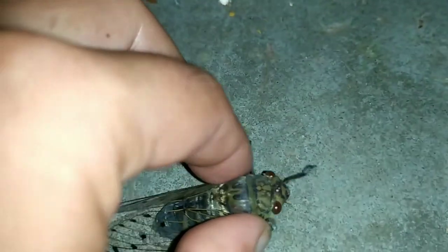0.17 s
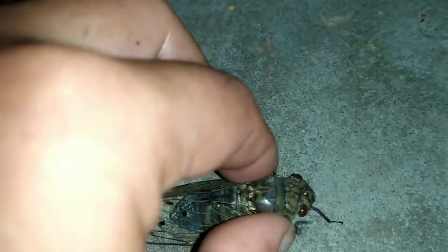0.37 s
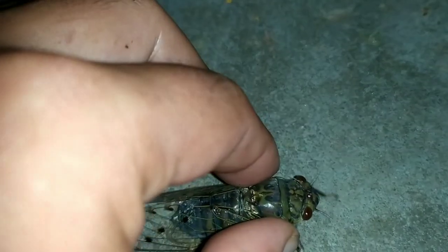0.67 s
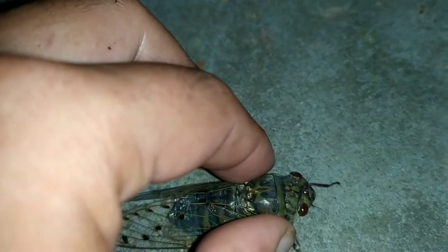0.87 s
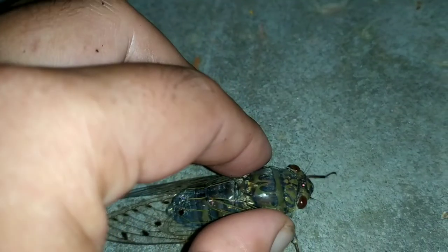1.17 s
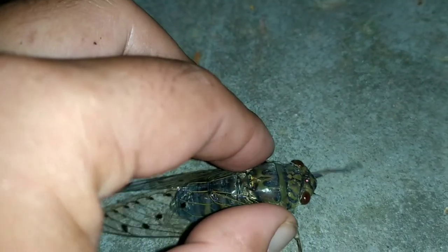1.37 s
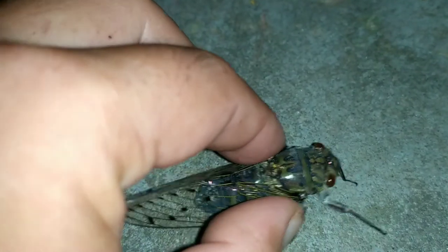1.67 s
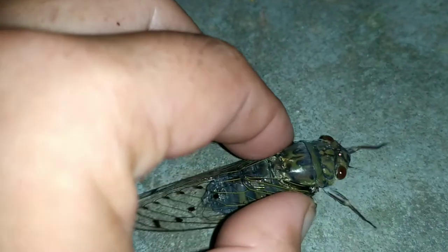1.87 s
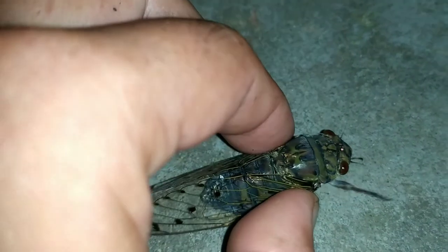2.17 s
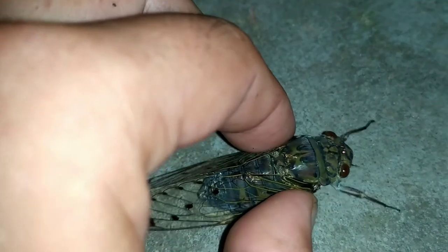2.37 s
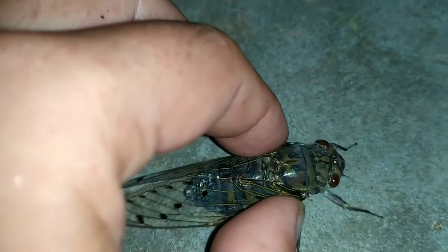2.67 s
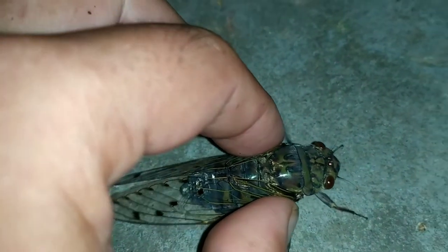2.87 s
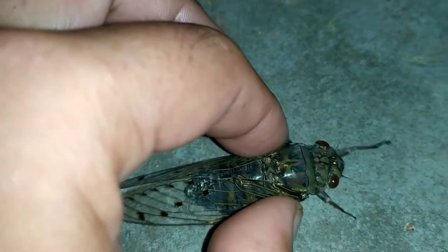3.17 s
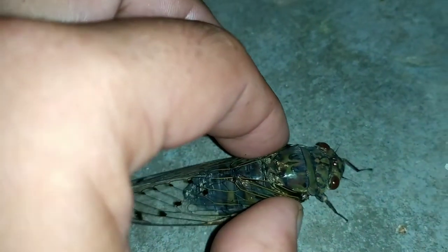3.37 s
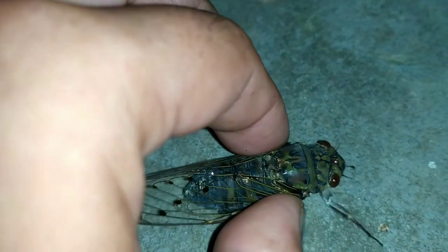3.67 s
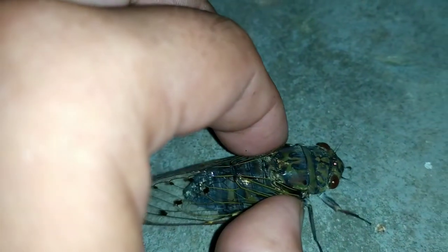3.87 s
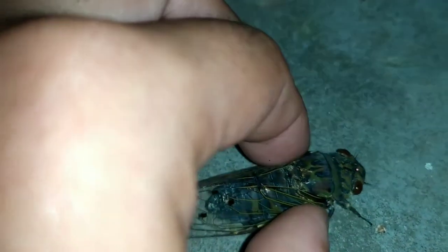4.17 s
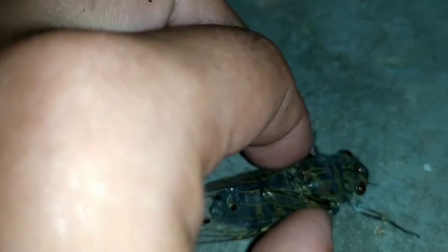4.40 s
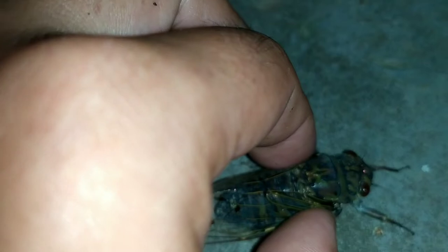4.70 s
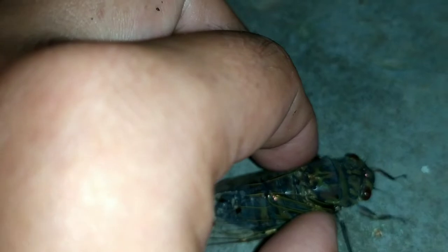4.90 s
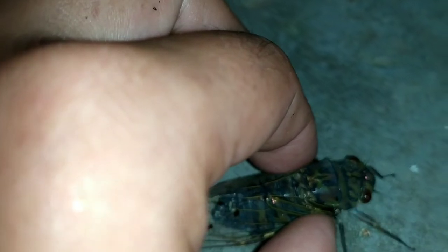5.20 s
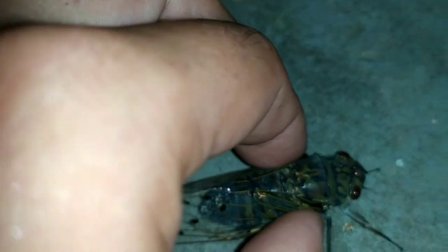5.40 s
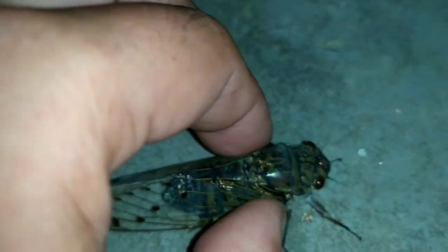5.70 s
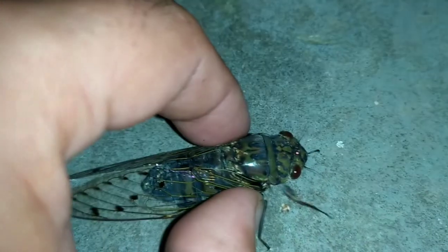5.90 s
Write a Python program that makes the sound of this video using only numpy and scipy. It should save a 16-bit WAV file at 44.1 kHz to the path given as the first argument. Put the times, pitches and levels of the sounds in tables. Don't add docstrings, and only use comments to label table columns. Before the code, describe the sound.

Bursts of raspy, buzzing cicada chirr very close up, separated by faint leg ticks and wing brushes, above a soft electrical hum and thin insect hiss.

```python
import sys
import numpy as np
from scipy import signal
from scipy.fft import rfft, irfft, next_fast_len
from scipy.io import wavfile
from scipy.ndimage import uniform_filter1d, map_coordinates

SR = 44100
rng = np.random.default_rng(int(sys.argv[2]) if len(sys.argv) > 2 else 0)


def unload_audio(sound):
    columns = np.transpose(np.atleast_2d(sound))
    steps = np.round(np.clip(columns, -1, 1) * 32767)
    wavfile.write(sys.argv[1], SR, steps.astype(np.int16))


def boost_factor(decibels):
    exponent = np.asarray(decibels, float) / 20
    return 10 ** exponent


N = 266628

# (first stroke t/s, last stroke t/s, strokes, hitch after the first/ms, grip number)
BUZZES = [
    (.4196, .5923, 32, 7.5, 0),
    (.6598, .6687, 2, 0, 0),
    (1.6302, 1.6713, 8, 1.8, 1),
    (1.7798, 1.8497, 14, -.5, 1),
    (2.5747, 2.6031, 5, 0, 2),
    (2.6117, 2.6905, 15, 1.5, 2),
    (3.023, 3.137, 20, 2, 2),
    (3.339, 3.4518, 21, 0, 2),
    (4.0229, 4.1228, 19, 0, 3),
]
# (belly level/dB, drum level/dB, drum swell over the run/dB, rib click rate f/Hz,
# far drum weaker by/dB)
VOICES = [(-25, -20.5, -1, 1060, -1.3), (-28.5, -22.5, 0.5, 1100, -3), (-24, -32, 3, 1170, 1),
          (-26.5, -29.5, 6, 1080, 0), (-27, -28.5, 5, 1100, 2.5), (-28, -24, 4, 1070, -1.5),
          (-27.5, -22.5, 0.5, 1095, 3), (-27.5, -22, 1.8, 1055, -0.5), (-24, -18.5, 2.5, 1090, -0.5)]
# (far drum late/ms, rattle level/dB, belly width/Hz, extra wait of the last stroke/ms)
GRIP_MANNERS = [(0, -15, 460, 2.2), (-0.19, -7, 360, 1.5), (-0.49, -15.5, 1070, 4.4),
                (0.07, -13.5, 530, 2.6)]
# (f/Hz, width/Hz, left level/dB, right level/dB)
DRUM_GRIP_0 = [(2240, 1040, -9.5, -28), (3240, 3000, -13, -13.5), (4160, 690, -22, -43),
               (5245, 250, 4, -6.5), (6020, 910, -1.5, -7.5), (7060, 2250, -3.5, -5.5),
               (10300, 3900, -8.5, -9.5), (13400, 1700, -11.5, -11)]
DRUM_GRIP_1 = [(2610, 610, -2, -21), (3350, 990, -9, -6), (4330, 370, -9.5, -24), (5260, 410, 3, -11.5),
               (6270, 820, -2, -7), (7640, 2250, -5.5, -6.5), (9850, 2500, -30, -8),
               (12000, 2200, -20, -10.5)]
DRUM_GRIP_2 = [(2374, 774, -15, -48), (3345, 550, -15.5, -13), (4760, 620, -11, -16.5), (5680, 315, 3, -6),
               (6940, 2270, -6.5, -17.5), (8030, 670, -5, -9), (9600, 540, -23.5, -15),
               (12500, 2600, -16.5, -19.5)]
DRUM_GRIP_3 = [(2300, 340, -11, -18.5), (3440, 990, -14, -12), (4230, 240, -11, -26),
               (5446, 300, 1.5, -3.5), (6230, 340, 2.5, -5), (8070, 610, -1, -4), (10000, 650, -7, -10),
               (12300, 2400, -12, -18)]
DRUM_GRIPS = [DRUM_GRIP_0, DRUM_GRIP_1, DRUM_GRIP_2, DRUM_GRIP_3]
DRUM_SIGNS = [(1, 1), (-1, 1), (-1, -1), (1, 1), (-1, -1), (1, 1), (-1, -1), (1, 1)]
# (push on belly level/dB, snap of drum level/dB)
RIBS = [(-1, -9), (0, -3), (0, -1), (-1, 0), (-3, -2), (-9, -8)]
# (t/s, peak level/dB, f/Hz, left over right/dB, t60/s)
CLAW_TICKS = [
    (2.1636, -20.5, 5600, 1, 0.0015),
    (2.187, -20, 5550, 4, 0.0021),
    (4.715, -24, 6730, 7, 0.0096),
    (4.969, -20.5, 7560, 5, 0.017),
    (5.173, -28, 5800, 7, 0.005),
]
# (t/s, peak level/dB)
WING_BRUSHES = [(0.2099, -45), (1.511, -38), (2.0682, -50), (2.366, -44), (2.5132, -39), (3.5428, -43),
                (3.6641, -46), (3.8594, -46), (5.4091, -48), (5.9194, -48)]
# (f/Hz, t60/s)
YARD_DECAY = [(700, .06), (3000, .11), (8000, .1), (14000, .06)]
# (t/s, level/dB, f/Hz, t60/s)
FINGER_THUMP = [
    (4.02, -38, 95, .15),
]
# (t/s, level/dB)
HUM_LEVEL = [(0.1, -41), (1.89, -38.5), (2.25, -36.5), (3.01, -37), (3.99, -35), (4.03, -38.5), (4.15, -37),
             (5.9, -39)]
# (f/Hz, density level/dB)
RUMBLE_SPECTRUM = [(15, -31), (25, -9), (80, -4.5), (102, -9.5), (125, -10.5), (145, -11), (166, -16.5),
                   (237, -18.5), (291, -18), (431, -21.5), (501, -24), (1040, -33.5), (2200, -37.5),
                   (2860, -71), (4840, -120)]
# (f/Hz, density level/dB)
CHORUS_SPECTRUM = [(1000, -20.5), (1800, -11), (2820, -9.5), (3600, 0), (4100, -5.5), (4650, -16),
                   (5500, -14.5), (6600, 2.5), (7400, -4.5), (8400, -17.5), (8900, -7), (10400, -2.5),
                   (11200, -17.5), (12300, -28.5), (14300, -19.5), (16000, -27)]
# (f/Hz, left-right likeness from -1 to 1)
NIGHT_LIKENESS = [(60, 0.62), (180, 1), (550, 0.73), (1650, -0.23), (4970, 0.0055), (15000, -0.046)]
# (f/Hz, left over right/dB)
NIGHT_LEAN = [(60, -1.5), (180, 0.5), (550, -1), (1650, 1.5), (4970, 8.5), (15000, -2.5)]
# (f/Hz, level/dB)
TONE_RESPONSE = [(20, -30), (45, -1), (70, 0), (14500, -0.5), (15400, 4.5), (15900, -17), (16600, -24),
                 (17000, -60)]
# (f/Hz, level/dB)
LINE_FLOOR = [(100, -60), (10800, -64), (11200, -11), (13000, -16), (14500, -15), (15300, -9),
              (16000, -12)]

START_DB, START_S = 4, 0.001
FADE_DB, FADE_S = 0.5, 0.018
RESTART_DB_PER_MS, RESTART_S = -0.12, 0.004
TIRE_STROKES = 1.5
RIB_SAG_HZ_PER_S = 60
BELLY_TUNE, BELLY_TOP_HZ = 0.93, 1190
CORE_HZ, CORE_SHARE = 204, 0.36
UPPER_HZ, UPPER_DB = 1526, -11.5
LAG_S = 8 / 44100
WING_HZ, WING_LEAN_DB, WING_T60_S = 12700, 5, .04
RUMBLE_DB, CHORUS_DB = -44.5, -49.5


def unit(x):
    return x / np.sqrt(np.mean(x ** 2) + 1e-20)


def along(points, hz):
    f, v = np.transpose(points)
    return np.interp(np.log(hz + 1), np.log(f + 1), v)


def wobble(rate):
    knots = rng.standard_normal(int(N * rate / SR) + 4)
    return map_coordinates(knots, [np.arange(N) * rate / SR])


def filtered(x, response):
    m = next_fast_len(x.shape[-1] + 8192)
    spectrum = rfft(x, m) * response(np.fft.rfftfreq(m, 1 / SR))
    return irfft(spectrum, m)[..., :x.shape[-1]]


def mode(f, hz, width_hz):
    return 1j * f * width_hz / (hz * hz - f * f + 1j * f * width_hz)


def clicks(seconds, sizes, size):
    places = np.round(seconds.ravel() * SR).astype(int)
    return np.bincount(places, sizes.ravel(), size)[:size]


def cicada():
    out = np.zeros((2, N))
    for strokes, voice in zip(BUZZES, VOICES):
        first = round(strokes[0] * SR) - 400
        sound = buzz(strokes, voice, first / SR)
        out[:, first:first + sound.shape[1]] += sound
    lags = [LAG_S / 2, -LAG_S / 2]
    return filtered(out, lambda f: np.exp(-2j * np.pi * np.outer(lags, f)))


def buzz(strokes, voice, start):
    size = SR // 3
    first, last, count, hitch_ms, grip = strokes
    belly_db, drum_db, swell_db, rib_hz, weaker_db = voice
    late_ms, rattle_db, belly_width_hz, tire_ms = GRIP_MANNERS[grip]
    beat = pace(first, last, count, hitch_ms, tire_ms)
    k = np.arange(count)
    far = (k % 2)[:, None]
    chance = rng.standard_normal((count, 3))
    scatter = rng.standard_normal((count, len(RIBS), 3))

    when = beat + (k % 2 * late_ms + .15 * chance[:, 0]) / 1000
    rib_rate = (rib_hz - RIB_SAG_HZ_PER_S * (when - when.mean()))[:, None]
    spacing = (.99 + .035 * k[:, None] / count + .03 * chance[:, 1:2]) / rib_rate
    steps = np.cumsum(1 + .08 * (np.arange(len(RIBS)) - 3)) - .76
    t = when[:, None] - start - .0019 + spacing * steps + 3e-5 * scatter[..., 0]

    push_db, snap_db = np.transpose(RIBS)
    push_sizes = boost_factor(push_db - far * weaker_db + .5 * chance[:, 2:] + .6 * scatter[..., 1])
    snap_sizes = boost_factor(snap_db - far * weaker_db + 1.3 * scatter[..., 2])
    belly = belly_ring(clicks(t, push_sizes, size), rib_hz, belly_width_hz)
    ring = drum_ring(t, snap_sizes, far, grip, rattle_db, size)

    clock = start + np.arange(size) / SR
    soft_start_db = START_DB * np.exp(-np.clip(clock - first + 0.0036, 0, None) / START_S)
    restart_db = RESTART_DB_PER_MS * max(hitch_ms, 0) * np.exp(-np.abs(clock - beat[1]) / RESTART_S)
    fade_db = FADE_DB * np.clip(1 - (last - clock) / FADE_S, 0, 1)
    effort_db = -soft_start_db - restart_db - fade_db
    swell_db = swell_db * (np.clip((clock - first) / (last - first), 0, 1) - .5)
    duty = np.sqrt((last - first + .006) * SR / size)
    mix = boost_factor(belly_db + 3.0) * unit(belly) + boost_factor(drum_db + swell_db + 4) * unit(ring)
    return duty * boost_factor(effort_db) * mix


def pace(first, last, count, hitch_ms, tire_ms):
    extra = tire_ms * np.exp(-np.arange(count - 1)[::-1] / TIRE_STROKES) / 1000
    extra[0] += hitch_ms / 1000
    waits = extra - extra.mean() + (last - first) / (count - 1)
    return first + np.r_[0, np.cumsum(waits)]


def drum_ring(t, snap_sizes, far, grip, rattle_db, size):
    def drum(f):
        total = 0
        for sign, (hz, width_hz, left_db, right_db) in zip(DRUM_SIGNS, DRUM_GRIPS[grip]):
            total = total + np.c_[list(sign)] * boost_factor([[left_db], [right_db]]) * mode(f, hz, width_hz)
        return total

    ring = np.zeros((2, size))
    for rib in range(len(RIBS)):
        pair = np.array([clicks(t[:, rib] + extra_s * far[:, 0], snap_sizes[:, rib], size)
                         for extra_s in (0, 2.5e-5)])
        pair[1] = np.roll(pair[1], 1)
        tail = signal.lfilter([1], [1, -boost_factor(-60 / (.013 * SR))], pair)
        rattle = tail * rng.standard_normal((2, size))
        ring += filtered(boost_factor(rattle_db - 2) * rattle - pair, lambda f: drum(f * (1 + .01 * (rib - 3))))
    return ring


def belly_ring(push, rib_hz, width_hz):
    def cavity(f):
        tune_hz = BELLY_TUNE * rib_hz
        core = 1 - CORE_SHARE + CORE_SHARE * mode(f, tune_hz, CORE_HZ)
        upper = boost_factor(UPPER_DB) * mode(f, UPPER_HZ, 220)
        skirt = mode(f, BELLY_TOP_HZ, 900)
        return (mode(f, tune_hz, width_hz) ** 2 * core - upper) * skirt * boost_factor([[0], [.3]])

    return filtered(push, cavity)


def legs():
    out, t = np.zeros((2, N)), np.arange(2000) / SR
    brushes = [(s, db, WING_HZ, WING_LEAN_DB, WING_T60_S) for s, db in WING_BRUSHES]
    for s, db, hz, pan_db, t60 in list(CLAW_TICKS) + brushes:
        scrape = boost_factor(-60 * t / t60) * rng.standard_normal((2, len(t)))
        ring = filtered(scrape, lambda f: (mode(f, hz, 0.13 * hz) + 0.29) * mode(f, hz, 1.8 * hz))
        sides = boost_factor(db + np.array([[pan_db / 2], [-pan_db / 2]]))
        out[:, round(s * SR):][:, :len(t)] += sides * ring / np.abs(ring).max()
    return out


def yard(x):
    hz, t, z = signal.stft(rng.standard_normal((2, SR // 4)), SR, nperseg=128)
    decay = boost_factor(-60 * t / along(YARD_DECAY, hz)[:, None])
    tail = signal.istft(z * decay, SR, nperseg=128)[1]
    late = np.pad(x, ((0, 0), (150, 0)))
    return signal.fftconvolve(late, tail / np.linalg.norm(tail[0]), axes=1)[:, :N]


def finger_thump(t):
    s, db, hz, t60 = FINGER_THUMP[0]
    since = np.clip(t - s, 0, None)
    ring = boost_factor(db - 60 * since / t60) * np.sin(2 * np.pi * hz * since)
    u = since / 0.0011
    return ring + boost_factor(db + 17) * u * (2 - u) * np.exp(-u)


def night():
    t = np.arange(N) / SR
    hum_db = np.interp(t, *np.transpose(HUM_LEVEL))
    turns = 2 * np.pi * 99.8 * t + 0.08 * wobble(3.26)
    octave = boost_factor(-27 + 2 * wobble(8)) * np.sin(2 * turns)
    hum = boost_factor(hum_db + 3 + .6 * wobble(6)) * (np.sin(turns) + octave)
    drone = boost_factor(-44 + 2.5 * wobble(7)) * np.sin(2 * np.pi * 59 * t + 1.6 * wobble(6))
    rumble = boost_factor(RUMBLE_DB) * rush(RUMBLE_SPECTRUM, patchy_db=1.5)
    chorus = boost_factor(CHORUS_DB + 0.57 * wobble(1.71)) * rush(CHORUS_SPECTRUM, patchy_db=1.4)
    return (hum + drone + finger_thump(t)) * boost_factor([[.6], [-.6]]) + rumble + chorus


def rush(spectrum, patchy_db):
    z = signal.stft(rng.standard_normal((2, N)), nperseg=512)[2]
    field = uniform_filter1d(rng.standard_normal(z.shape[1:]), size=6, axis=0)
    field = uniform_filter1d(field, size=10, axis=1)
    pair = signal.istft(z * boost_factor(patchy_db * unit(field)), nperseg=512)[1][:, :N]

    def mid_side(hz):
        turn = np.arccos(np.clip(along(NIGHT_LIKENESS, hz), -1, 1)) / 2
        return boost_factor(along(spectrum, hz)) * [np.cos(turn), np.sin(turn)]

    mid, side = filtered(pair, mid_side)
    both = np.array([mid + side, mid - side])
    both = filtered(both, lambda hz: boost_factor(np.outer([.5, -.5], along(NIGHT_LEAN, hz))))
    return both / np.std(both.mean(0))


def thinned(x):
    hz, _, z = signal.stft(x, SR, window="cosine", nperseg=1024)
    level = 20 * np.log10(np.abs(z) + 1e-9)
    z = z * (level > along(LINE_FLOOR, hz)[:, None] - 70)
    bands = z[:, :512].reshape(2, 64, 8, -1)
    power = np.abs(uniform_filter1d(np.mean(np.abs(bands) ** 2, axis=2), size=2, axis=2))
    reach = boost_factor(-2 * 2.2 * np.abs(np.subtract.outer(np.arange(64), np.arange(64))))
    reach[:, :5] = 0
    top = power[:, 5:].max(axis=1, keepdims=True)
    loud = top > boost_factor(-2 * 55)
    luck = unit(uniform_filter1d(rng.standard_normal(power.shape[1:]), size=3, axis=1))
    margin_db = 14 - loud * (3.5 + 3 * luck)
    masker = boost_factor(-2 * margin_db) * np.einsum("ab,cbt->cat", reach, power)
    masked = power < masker + loud * boost_factor(-2 * 25) * top
    masked[:, 42:] |= uniform_filter1d(1. * loud, size=4, axis=2, origin=1) > .9
    masked[:, :5] = False
    z[:, :512] = (bands * ~masked[:, :, None]).reshape(2, 512, -1)
    return signal.istft(z, SR, window="cosine", nperseg=1024)[1][:, :N]


def scene():
    near = cicada() + legs()
    return near + boost_factor(-19) * yard(near) + night()


def band_limit(x):
    return signal.sosfilt(signal.butter(12, 16830, fs=SR, output="sos"), x)


def record(dry):
    x = filtered(dry, lambda f: boost_factor(along(TONE_RESPONSE, f)))
    x = x / (1 + np.abs(x / .8) ** 4) ** (1 / 4)
    mix = thinned(x)
    return band_limit(mix)


dry = scene()
out = record(dry)
unload_audio(out)
```